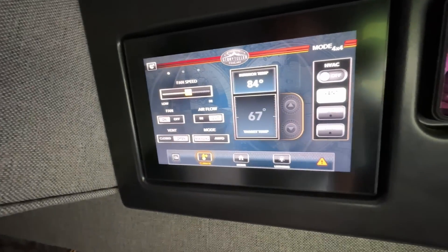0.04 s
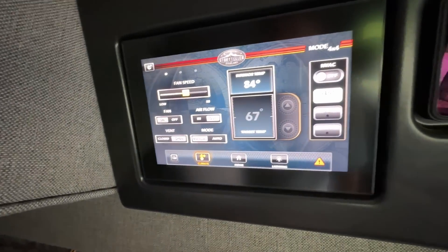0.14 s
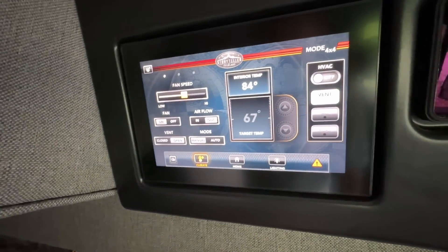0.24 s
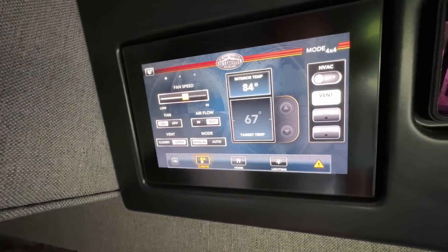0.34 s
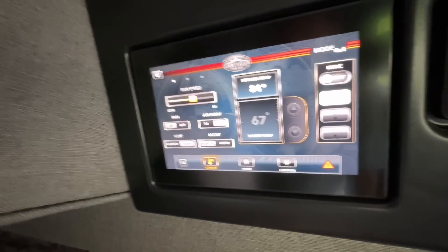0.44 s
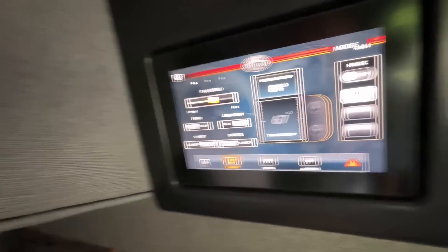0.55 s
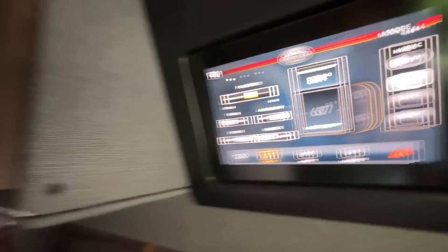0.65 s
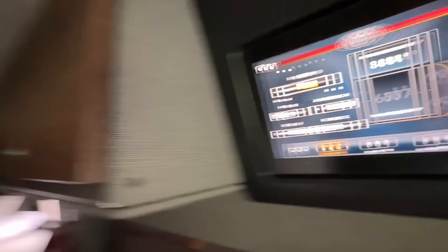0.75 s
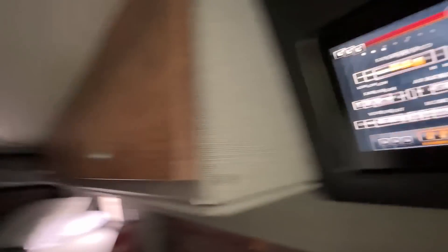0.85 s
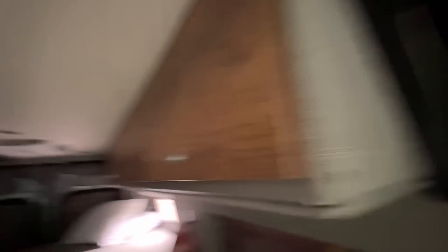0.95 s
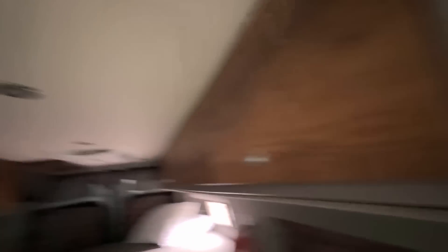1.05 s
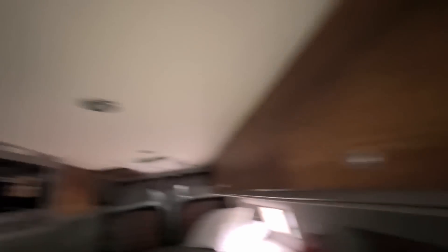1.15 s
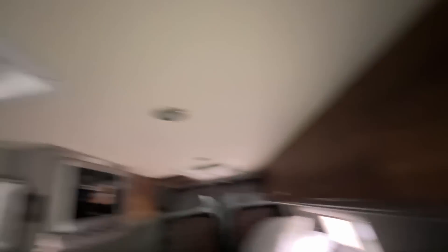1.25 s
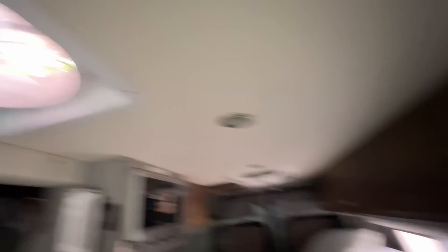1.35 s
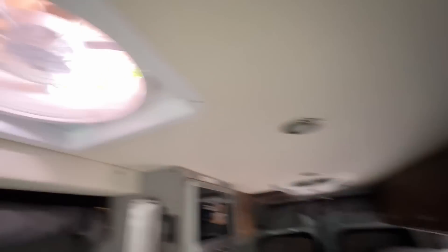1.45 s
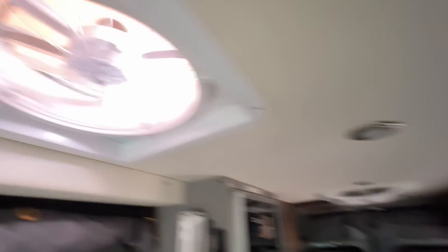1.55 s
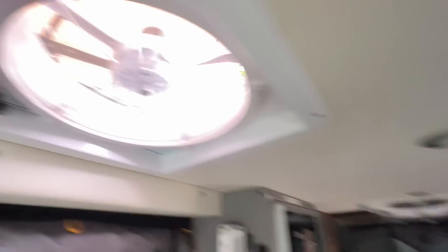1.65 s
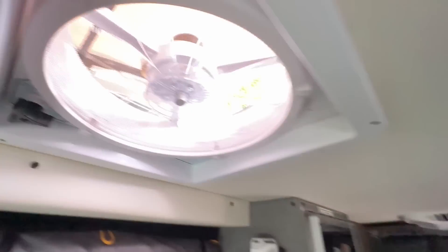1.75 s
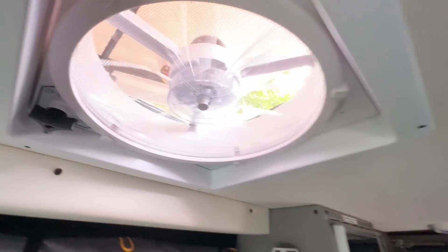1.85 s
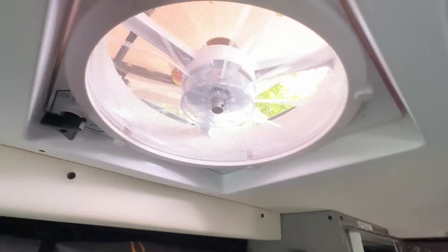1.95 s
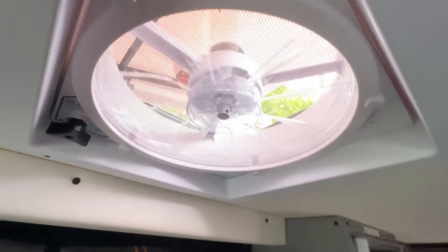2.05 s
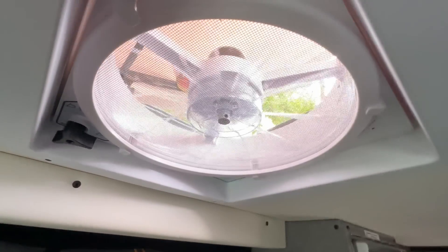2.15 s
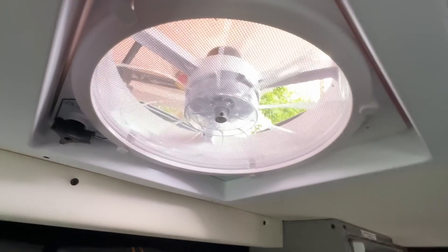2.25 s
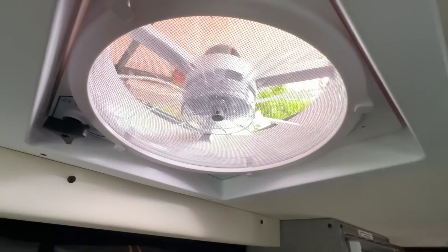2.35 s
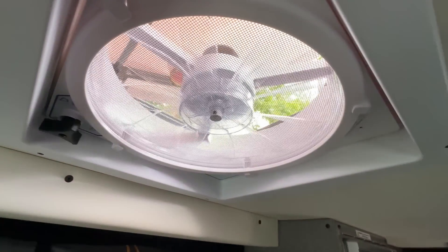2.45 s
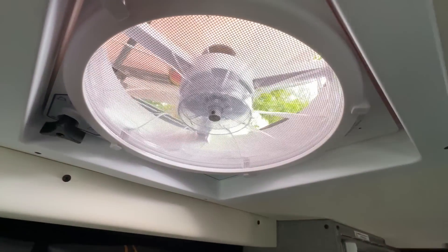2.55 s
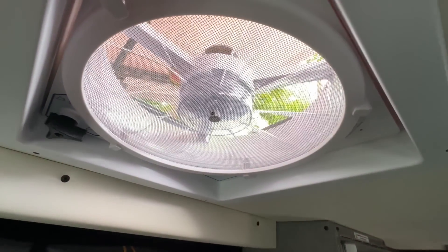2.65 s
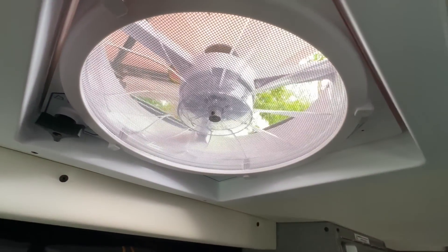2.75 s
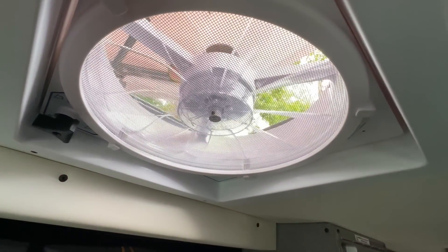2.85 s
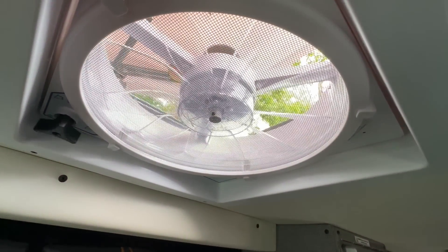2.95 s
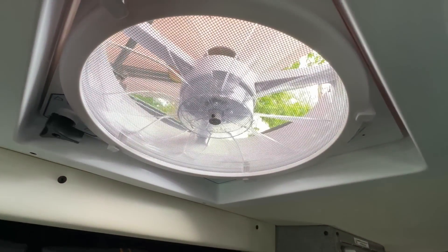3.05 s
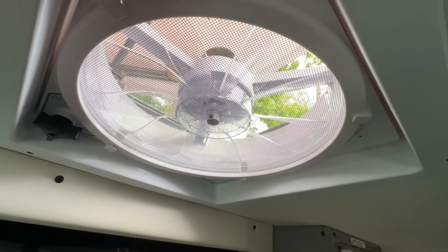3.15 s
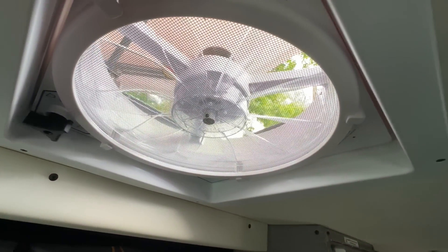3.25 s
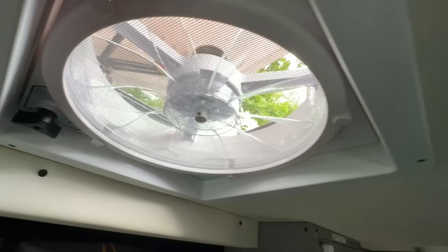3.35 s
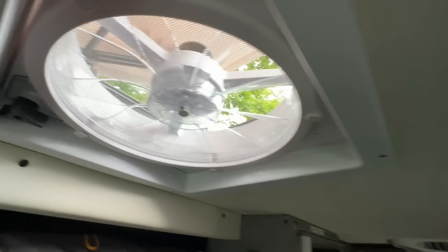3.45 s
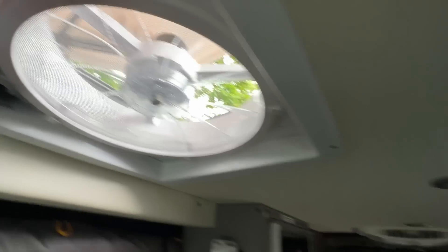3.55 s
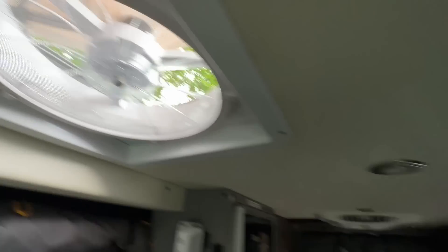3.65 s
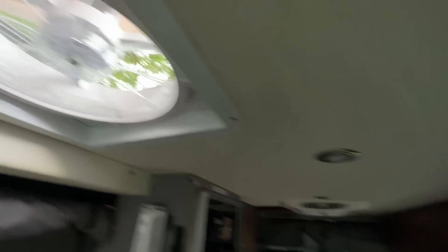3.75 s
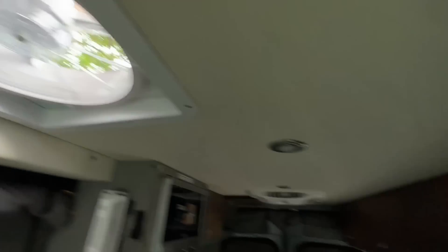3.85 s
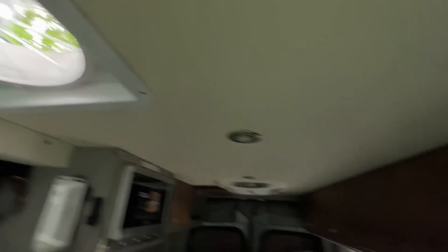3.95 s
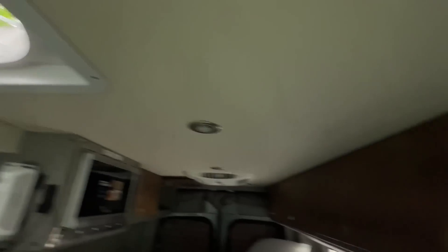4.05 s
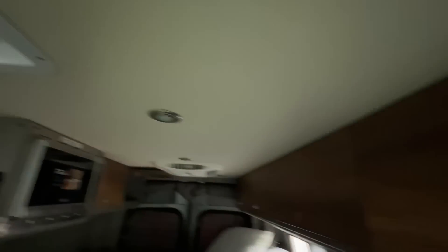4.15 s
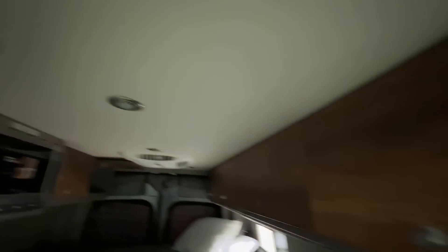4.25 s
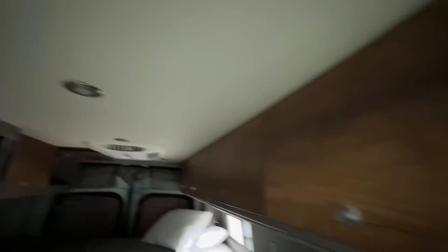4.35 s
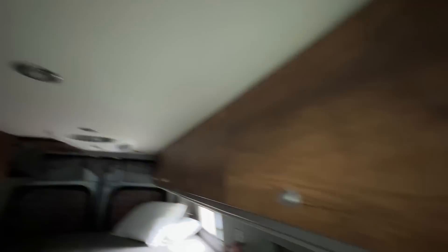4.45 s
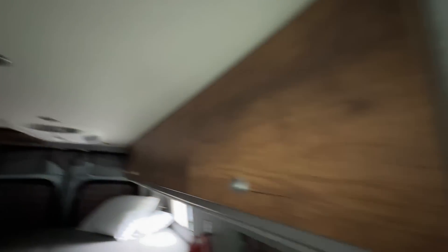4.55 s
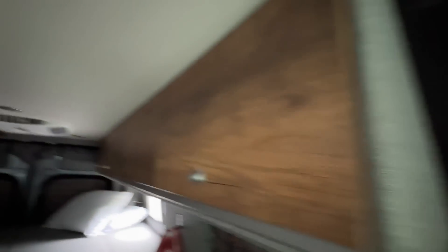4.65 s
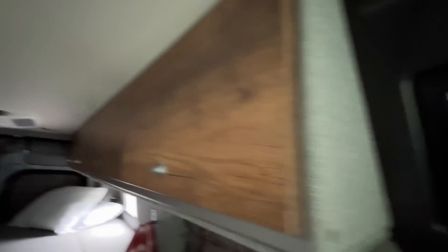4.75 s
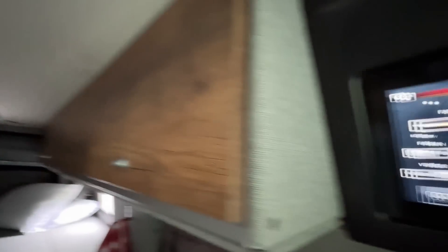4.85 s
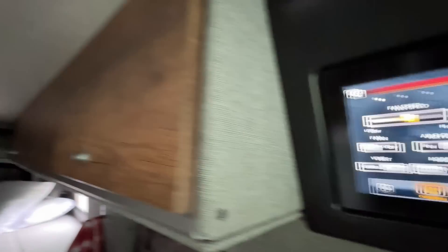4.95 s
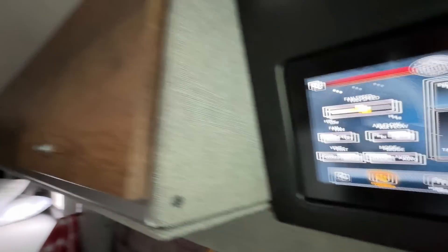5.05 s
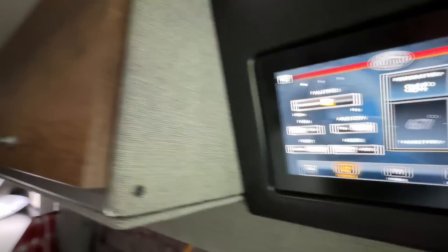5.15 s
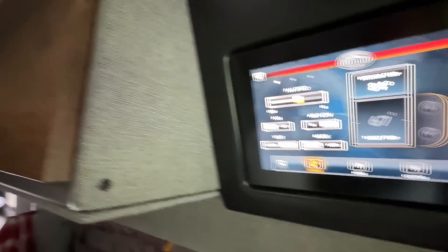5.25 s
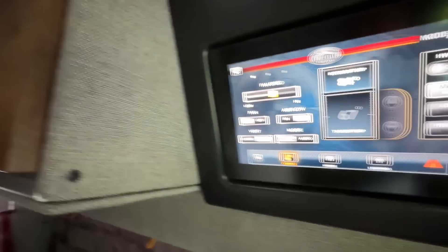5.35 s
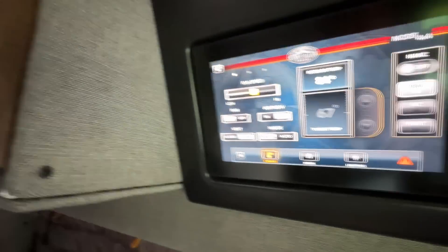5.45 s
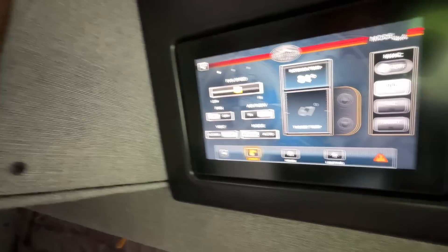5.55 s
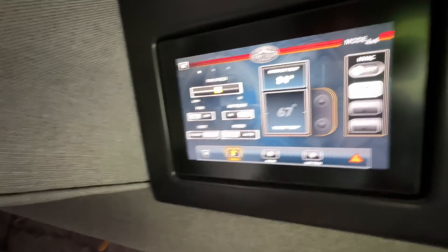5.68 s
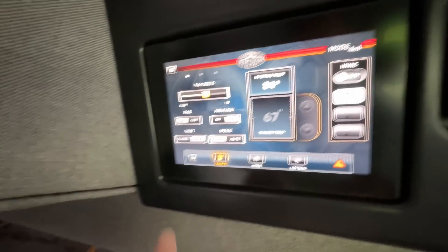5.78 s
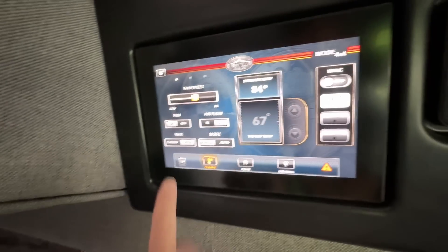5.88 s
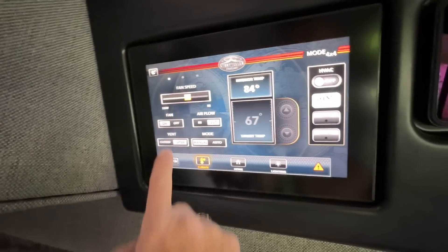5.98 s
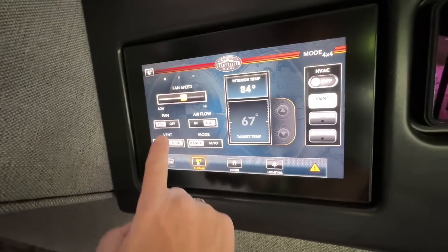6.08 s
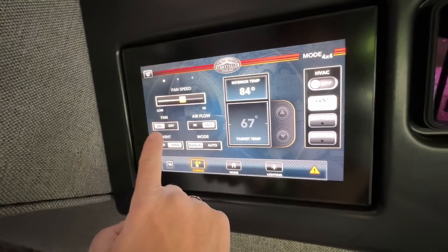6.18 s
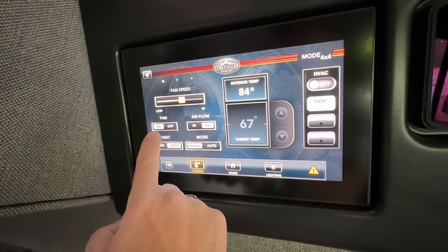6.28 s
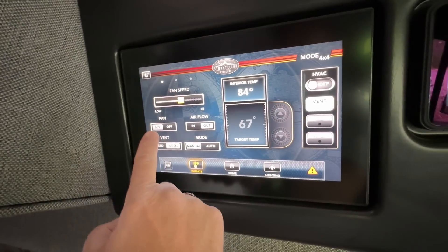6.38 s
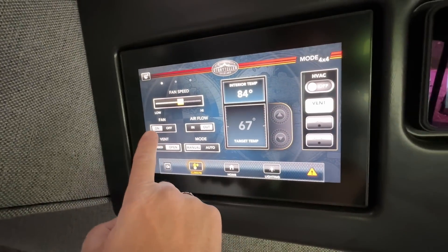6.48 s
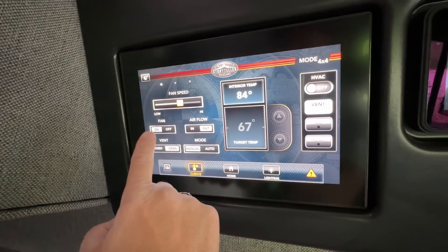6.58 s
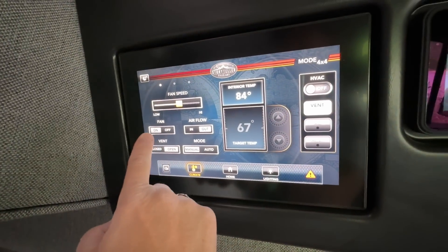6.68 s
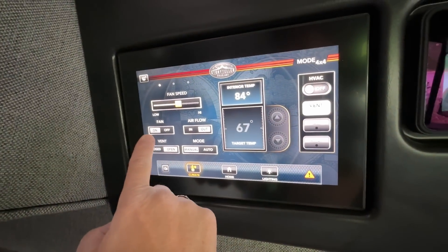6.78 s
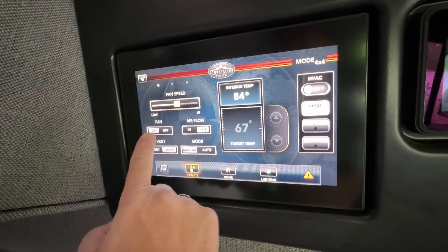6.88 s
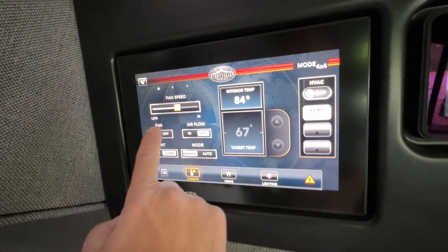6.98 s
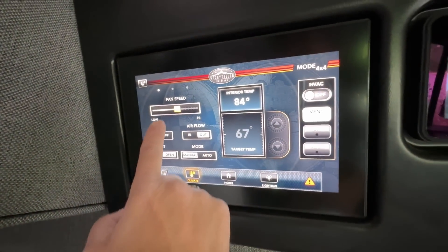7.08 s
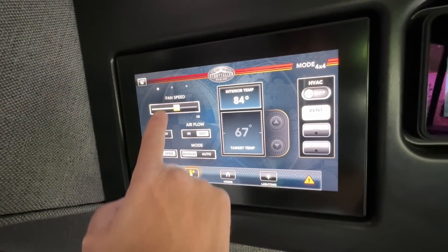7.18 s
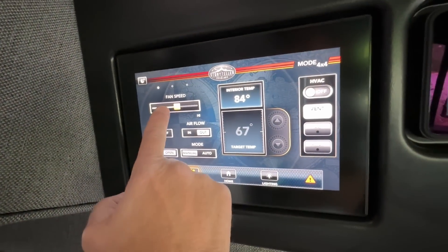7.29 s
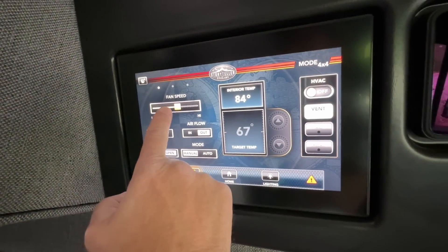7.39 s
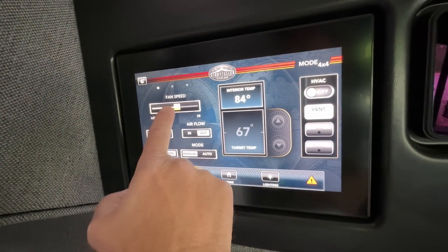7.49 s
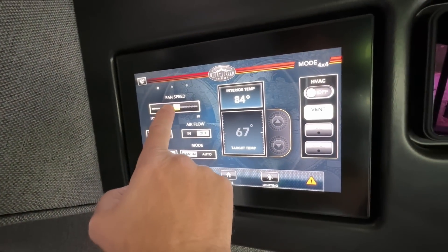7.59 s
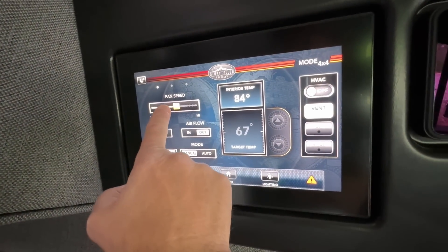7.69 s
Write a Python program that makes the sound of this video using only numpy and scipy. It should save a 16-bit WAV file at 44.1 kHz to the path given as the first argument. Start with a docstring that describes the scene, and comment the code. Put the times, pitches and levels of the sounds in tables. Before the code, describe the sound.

A small geared motor whines steadily with a buzzy, hissing edge inside a van, then loses power, its pitch sliding down into rattle and faint knocks.

```python
"""A small geared motor cranks a roof vent lid open inside a van: its rotor whines twelve times a turn, buzzes
on the multiples of its turn and hisses at the brushes, coloured by the plastic housing. The low end stays
nearly empty until 0.6 s. From 1.4 to 3.9 s the hand-held microphone faces the vent, then swings back, through
the cabin's standing waves. At 6.6 s the power is cut: the tones fall with the rotor, the loose gears rattle,
and a few knocks end it. Rumble and a faint hiss, both filtered noise, remain."""
import sys
import numpy as np
from scipy import signal
from scipy.fft import rfft, irfft
from scipy.io import wavfile
from scipy.ndimage import uniform_filter1d

SR = 44100
rng = np.random.default_rng(int(sys.argv[2]) if len(sys.argv) > 2 else 0)


def store_wav(level_fs):
    """Save 16-bit WAV to argv[1]."""
    pcm = np.round(np.clip(np.atleast_2d(level_fs), -1, 1) * 32767)
    wavfile.write(sys.argv[1], SR, pcm.T.astype(np.int16))


N = 340578
TIME_S = np.arange(N) / SR
FREQ_HZ = np.maximum(np.arange(N // 2 + 1) * SR / N, 1)
SIDES = np.array([[1], [-1]])   # left, right port

# faint hiss, spectrum: f/Hz, relative level/dB
AIR_COLOUR = [(100, -18), (500, 0.5), (1100, 6), (1600, 0), (3000, -7.5), (4500, -13), (7000, -8),
              (9500, -31), (15000, -29)]
AIR_DB = -66.5
# cabin rumble before trim: t/s, deep level/dB, upper level/dB
RUMBLE = [(0, -105, -75), (.54, -99, -75), (.62, -55, -63.5), (1, -58.5, -57), (2.1, -57.5, -52.5),
          (4.5, -56, -55.5), (5.8, -52.5, -57.5), (6.7, -48, -60.5), (7.3, -49, -57), (7.72, -61.5, -59.5)]
# rumble spectrum: f/Hz, relative level/dB
RUMBLE_COLOUR = [(18, -18), (30, -11.5), (42, -2), (52, -8), (72, 5), (105, 0), (180, 3), (250, -3.5),
                 (300, -15.5), (340, -7.5), (450, -38), (1200, -26), (4000, -59.5)]
# low hum before trim: t/s, level/dB
HUM = [(.55, -93), (.9, -48), (1.2, -44), (1.4, -72), (1.8, -47.5), (2.7, -48.5), (3.8, -53), (7.72, -82)]
HUM_HZ = 61.4
# handling sounds: t/s, peak level/dB, rise/s, fall/s, lower edge f/Hz
HANDLING = [(1.059, -47.5, 0.016, 0.023, 6500), (7.097, -49.5, 0.00088, 0.021, 3950)]

# powered rotor, easing once per crank turn: t/s, speed/(turns/s)
RUNNING_SPEED = [(0.0, 104.6), (0.12, 103.9), (0.4, 107.1), (0.68, 107.2), (0.88, 105.0), (1.24, 104.6),
                 (1.44, 105.1), (1.84, 109.2), (1.96, 109.8), (2.08, 108.1), (2.24, 107.7), (2.48, 105.6),
                 (2.64, 106.5), (2.84, 106.9), (3.04, 109.5), (3.16, 109.8), (3.28, 108.9), (3.56, 105.4),
                 (3.64, 103.8), (3.76, 103.5), (3.96, 104.0), (4.08, 103.0), (4.36, 106.9), (4.44, 106.8),
                 (4.6, 108.4), (4.84, 105.5), (5.12, 103.7), (5.44, 104.5), (5.8, 108.5), (5.96, 108.2),
                 (6.12, 105.6), (6.2, 106.0), (6.44, 103.3), (6.56, 103.4)]
# coast under drag and friction: t/s, speed/(turns/s)
COAST_SPEED = [(6.62, 103), (6.66, 99), (6.7, 94.2), (6.81, 79.6), (6.9, 65), (6.98, 57.8), (7.1, 43.9),
               (7.2, 33.8), (7.3, 25), (7.62, 1)]
OFF_S, LOOSEN_S = 6.61, 0.06   # power cut; time the gears take to come loose
# vent as heard: t/s, left port lag/ms, treble left-right level/dB before register share, facing/0-1
BEARING = [(0, -0.308, -1, 0.44), (1.2, -0.27, -3.5, 0.29), (1.4, -0.34, -3, 0.65), (1.65, 0.25, -6, 1),
           (1.9, 0.45, -7, 1), (3.4, 0.48, -7, 1), (3.85, 0.48, -0.5, 0.59), (4.1, -0.55, 0, 0.31),
           (4.7, -0.343, -3.5, 0.35), (5.3, -0.28, -4, 0.22), (5.9, -0.261, -2, 0.45),
           (6.6, -0.292, -3.5, 0.23)]
LOW_LAG_SHARE = 0.7   # reflections shorten the lag of tones below 20 cycles per turn
# wall detours: shortest, longest, sway (1 sigma) as the microphone moves
ECHO_MIN_MS, ECHO_MAX_MS, ECHO_SWAY_MS = 1, 9, 0.22
CABIN_T60_S, CABIN_DB = 0.16, -4   # short ring behind the falling tones

# rough patches where the gears graze: t/s, peak level/dB, half length/s
GRAZES = [(4.17, -46, 0.25), (4.6, -59, 0.21), (6.46, -48.5, 0.16)]
GRAZE_HZ, GRAZE_WIDTH_HZ = 1420, 620
# gearbox resonances: f/Hz, width/Hz, gain/dB
GEARBOX = [(685, 36, 1.5), (1088, 72, 11.5), (1850, 490, 8), (3064, 520, 14.5), (3820, 210, 6.5),
           (4700, 400, -2)]
RATTLE_DB, RATTLE_FALL_DB = -45.5, 25   # at switch-off speed; fall per tenfold drop in speed
# last knocks of the slack gears: t/s, onset level/dB
KNOCKS = [(7.276, -55), (7.325, -62), (7.368, -79), (7.563, -64)]
KNOCK_DECAY_S = 0.01

# strong buzz lines: order/(cycles/turn), level over the rest/dB
BUZZ = [(7, -5.5), (13, -3.5), (15, 2.5), (17, 5), (23, -1), (27, 6.5), (28, -1.5), (32, 10.5), (35, 6.5),
        (37, 10), (42, 4), (44, 1)]
# broad motor spectrum: f/Hz, relative level/dB
COLOUR = [(120, -36.5), (190, -16.5), (330, -11.5), (480, -10), (800, -3), (1400, 11.5), (1950, 2),
          (2400, 2.5), (3400, -2), (5500, -5), (7000, -5.5), (8200, -9), (9500, -31), (11200, -16),
          (13000, -33), (15000, -20.5)]
# housing resonances: f/Hz, width/Hz, gain/dB
HOUSING = [(254, 80, 7), (620, 36, 5), (1100, 88, 4), (1263, 200, 8.5), (1800, 30, 3.5), (2434, 110, 3),
           (2750, 8.8, 2), (2896, 32, 9.5), (3090, 140, 5.5), (3688, 58, 12), (3874, 156, 9.5),
           (4615, 260, 11), (4767, 54, 4), (4930, 520, 5.5), (6460, 60, 9.5), (6124, 650, 8)]
# extra gain of the lowest register: t/s, gain/dB
LOW_MIDS = [(0, -3.5), (.55, -15.5), (.75, -9.5), (1, 0), (1.5, -1.5), (3.3, 3.5), (4.1, -3), (4.85, -5),
            (5.1, -3), (5.8, -6), (6.4, 1), (6.8, -7.5)]
# buzz and brush registers, low to high: level/dB, gain facing the vent/dB,
# loss per tenfold drop in speed/dB, share of the treble left-right dB
REGISTERS = [(-53.5, 2.5, 6, 0.05), (-50.5, 7, 42, -0.12), (-49, 7.5, 26, 0.01), (-49, 8, 34.5, 1.72),
             (-90.5, 31.5, 30, -0.5)]
FADING_HZ = 6   # rate of passing standing waves

# falling tones: order/(cycles/turn), base level/dB, loss per tenfold drop in speed/dB
COAST_TONES = [(12, -50.5, 10), (24, -51, 27), (36, -50, 35), (48, -52.5, 40), (60, -64, 36)]
# peaks and gaps of the path through the cabin: f/Hz, width/Hz, gain/dB
PATH_PEAKS = [(1195, 60, 7), (1450, 160, -7), (2330, 220, -9), (3450, 200, -7), (4200, 380, -12),
              (4720, 350, 6)]
RADIATES_ABOVE_HZ = 660   # the small housing hardly sounds below
BREAK_DB, BREAK_HZ = 3.5, 30   # break-up of falling tones: 1-sigma depth near standstill, rate

# powered tones: order/(cycles/turn), trim on its level curve/dB
HARMONICS = [(12, 0.3), (24, 1.3), (36, 0), (48, 0), (60, 0), (11, -0.5), (10, -1.5), (8, 2), (6, 1)]
# level curves before trim, orders 12, 24, 36, 48, 60 and 11: t/s, left level/dB, right level/dB
WHINE = [(0.0, -44.5, -54.0), (0.26, -44.5, -44.0), (0.42, -33.0, -38.5), (0.62, -36.0, -34.5),
         (0.76, -41.5, -41.5), (0.86, -54.0, -53.5), (0.96, -47.5, -47.0), (1.2, -46.5, -47.5),
         (1.24, -43.5, -44.0), (1.52, -45.5, -42.5), (1.64, -32.0, -27.5), (1.82, -44.5, -40.5),
         (1.92, -41.0, -34.5), (2.14, -32.5, -34.5), (2.28, -35.5, -42.0), (2.42, -33.5, -36.0),
         (2.46, -38.5, -43.0), (2.62, -31.5, -33.5), (2.88, -34.0, -37.0), (2.98, -46.5, -36.0),
         (3.16, -41.5, -34.0), (3.3, -42.5, -38.0), (3.32, -67.5, -38.0), (3.4, -43.5, -46.0),
         (3.46, -38.0, -40.0), (3.56, -42.0, -49.0), (3.58, -49.0, -45.0), (3.72, -38.5, -48.5),
         (3.86, -54.0, -40.0), (4.04, -46.5, -51.0), (4.26, -44.0, -40.5), (4.32, -44.0, -48.0),
         (4.38, -35.0, -38.5), (4.54, -44.0, -40.0), (4.58, -54.0, -49.0), (4.64, -43.5, -43.0),
         (5.06, -53.0, -58.0), (5.34, -44.5, -50.5), (5.4, -48.5, -50.0), (5.5, -40.0, -39.5),
         (5.6, -41.0, -37.5), (5.88, -46.5, -47.5), (6.02, -36.5, -35.5), (6.22, -46.0, -38.0),
         (6.3, -42.0, -41.0), (6.6, -50.0, -50.5)]
WHINE_SECOND = [(0.0, -57.5, -57.0), (0.22, -47.5, -45.0), (0.5, -45.0, -51.0), (0.56, -52.0, -68.0),
                (0.62, -62.0, -48.5), (0.7, -45.0, -45.0), (0.82, -51.0, -58.0), (0.92, -53.5, -48.5),
                (1.12, -48.5, -55.0), (1.38, -49.0, -49.5), (1.58, -38.5, -50.0), (1.78, -45.0, -40.5),
                (1.98, -52.0, -41.0), (2.04, -41.0, -36.5), (2.24, -46.5, -36.0), (2.48, -50.0, -43.5),
                (2.6, -44.0, -38.5), (2.84, -41.0, -42.0), (3.18, -60.0, -45.0), (3.24, -65.0, -39.5),
                (3.32, -51.0, -39.5), (3.46, -45.0, -45.0), (3.88, -56.5, -58.5), (4.32, -52.0, -47.5),
                (4.42, -45.5, -42.5), (4.5, -61.0, -55.5), (4.58, -52.0, -41.0), (4.68, -62.5, -57.5),
                (4.72, -52.0, -45.5), (5.12, -50.5, -51.5), (5.28, -44.5, -46.0), (5.74, -50.5, -51.5),
                (5.78, -66.5, -68.5), (5.96, -51.5, -57.0), (6.0, -42.5, -43.0), (6.6, -57.0, -54.0)]
WHINE_THIRD = [(0.0, -42.5, -42.0), (0.18, -40.5, -41.5), (0.32, -46.0, -35.5), (0.6, -41.5, -36.5),
               (0.68, -52.0, -50.0), (0.76, -45.5, -44.0), (0.98, -47.0, -49.0), (1.1, -45.5, -42.0),
               (1.18, -45.5, -48.5), (1.22, -47.0, -36.0), (1.26, -41.5, -41.0), (1.3, -44.5, -34.5),
               (1.42, -36.5, -35.0), (1.58, -45.0, -33.0), (1.62, -37.0, -38.0), (1.66, -42.5, -41.0),
               (1.94, -46.5, -33.5), (2.12, -45.0, -36.0), (2.14, -47.5, -43.5), (2.2, -43.5, -34.5),
               (2.3, -48.5, -42.5), (2.34, -39.0, -45.5), (2.6, -43.5, -38.0), (2.72, -47.5, -51.0),
               (2.74, -48.0, -45.0), (2.82, -51.5, -56.5), (2.96, -45.5, -38.5), (3.06, -59.5, -39.0),
               (3.18, -50.0, -40.0), (3.24, -52.0, -35.0), (3.52, -39.5, -40.0), (3.54, -42.0, -49.0),
               (3.58, -40.5, -38.5), (3.68, -45.5, -45.0), (3.8, -40.5, -36.5), (3.88, -34.0, -40.5),
               (3.94, -47.0, -33.0), (4.0, -37.0, -46.0), (4.04, -42.0, -36.5), (4.12, -44.5, -44.5),
               (4.18, -44.5, -37.0), (4.28, -41.5, -49.0), (4.44, -42.0, -37.0), (4.52, -46.5, -43.5),
               (4.54, -56.0, -48.5), (4.72, -40.0, -41.0), (4.76, -46.0, -38.0), (5.04, -47.5, -47.0),
               (5.12, -52.0, -48.0), (5.22, -44.5, -46.5), (5.34, -51.0, -49.5), (5.54, -44.5, -43.5),
               (5.6, -41.5, -35.0), (5.76, -49.5, -41.5), (6.0, -42.0, -35.5), (6.2, -48.0, -36.5),
               (6.36, -45.0, -47.0), (6.6, -49.5, -46.5)]
WHINE_FOURTH = [(0, -62, -47), (1.2, -67, -54), (1.65, -58, -47.5), (3.4, -60, -45), (4.1, -53, -48),
                (5.3, -62, -49.5), (6.6, -63, -50.5)]
WHINE_FIFTH = [(0.0, -56, -52.5), (1.14, -65, -63), (1.65, -63, -37), (1.98, -65, -53), (2.04, -51, -38.5),
               (2.76, -71, -51.5), (2.94, -52, -35), (3.0, -64, -53), (3.51, -61, -41), (3.78, -64, -64),
               (3.84, -70.5, -42), (4.17, -58, -51.5), (4.92, -61, -63), (5.4, -67, -67), (5.58, -65, -51),
               (5.94, -79, -52), (6.15, -62, -48), (6.57, -71, -69)]
UNDER_WHINE = [(0.0, -50.0, -57.0), (0.4, -56.0, -50.0), (0.64, -64.0, -52.0), (0.7, -50.0, -48.0),
               (1.12, -48.5, -42.5), (1.16, -58.0, -60.0), (1.3, -43.0, -42.0), (1.36, -55.0, -56.5),
               (1.42, -44.0, -50.5), (1.6, -42.5, -48.0), (1.7, -51.0, -44.0), (1.78, -60.5, -59.5),
               (1.84, -52.5, -51.5), (2.04, -60.0, -53.0), (2.14, -46.5, -53.0), (2.34, -50.5, -52.0),
               (2.94, -50.0, -50.5), (3.38, -53.0, -50.5), (3.78, -44.0, -42.0), (3.92, -53.0, -48.0),
               (3.98, -63.5, -63.0), (4.1, -46.5, -48.0), (4.22, -43.0, -42.0), (4.5, -49.5, -62.0),
               (4.78, -48.0, -41.0), (5.02, -52.0, -51.5), (5.52, -41.0, -43.0), (5.86, -52.5, -52.5),
               (6.1, -50.5, -44.5), (6.6, -58.0, -55.0)]
# level curves before trim, orders 10 and 8: t/s, level/dB
TENTH_ORDER = [(0, -61.5), (5.3, -71.5), (5.6, -52), (5.95, -46), (6.1, -61.5), (6.6, -54)]
EIGHTH_ORDER = [(0, -68), (.6, -78), (1.3, -68), (1.6, -58), (2.3, -57), (2.75, -51), (2.95, -57),
                (3.25, -59), (3.42, -49.5), (3.7, -62), (3.9, -69), (6.6, -66)]
# level curve before trim, order 6: t/s, left level/dB, right level/dB
LOW_OCTAVE = [(0, -68, -69), (.64, -87, -84), (.9, -68, -71), (1.3, -62, -62), (1.62, -56, -61),
              (2.08, -56, -51), (2.52, -57, -60), (2.7, -52, -51), (3.32, -53, -47), (3.8, -56, -62),
              (4.1, -68, -66), (4.6, -63, -60), (4.95, -60, -65), (5.3, -63, -65), (5.75, -75, -74),
              (6.35, -63, -63), (6.6, -65, -66)]
# standing-wave shift between the ports, orders 12 and 36: t/s, left lead/cycles
WHINE_LEAD = [(0.0, -0.32), (0.21, -0.86), (0.75, -0.81), (0.96, -0.55), (1.44, -0.74), (1.47, -0.99),
              (1.77, -1.09), (1.86, -1.35), (2.07, -1.48), (2.3, -1.32), (2.75, -1.33), (2.95, -1.4),
              (3.36, -1.38), (3.6, -1.23), (3.63, -0.96), (3.81, -1.34), (4.26, -1.46), (4.56, -1.37),
              (4.77, -2.16), (5.13, -2.78), (5.43, -2.53), (5.58, -2.87), (6.09, -2.83), (6.3, -2.56),
              (6.57, -2.48)]
THIRD_LEAD = [(0, 1.05), (.3, .8), (.42, 1.05), (.7, 1.1), (1.42, 1.42), (1.53, 1.25), (1.8, 0),
              (2.05, -.43), (2.45, -.25), (2.8, -.48), (3.47, -.12), (3.65, -.5), (3.9, 0), (4.42, -.05),
              (4.65, -.35), (5.05, 0), (6.05, .1), (6.22, -.25), (6.57, .15)]
SLOTS = 12
FLUTTER, WANDER_RAD = 0.2, 0.17   # unsteadiness of powered tones at order 24

CUTOFF_HZ = 15800


def from_db(db):
    """Decibels to gain."""
    return 10 ** (np.asarray(db) / 20)


def rms_one(x):
    """Scale to unit power."""
    return x / np.sqrt(np.mean(x ** 2) + 1e-20)


def in_time(rows):
    """Each column of a curve table at every sample."""
    s, *columns = np.transpose(rows)
    return [np.interp(TIME_S, s, c) for c in columns]


def over_hz(points):
    """A short spectrum on the frequency grid, in dB."""
    hz, db = np.transpose(points)
    return np.interp(np.log(FREQ_HZ), np.log(hz), db)


def shaped(x, gain):
    """Filter by a gain per frequency."""
    return irfft(rfft(x) * gain, N)


def drift(rate_hz):
    """Slow chance with spread 1: low-passed noise made at SR / 32."""
    size = N // 32 + 2
    hz = np.arange(size // 2 + 1) * SR / 32 / size
    slow = irfft(rfft(rng.standard_normal(size)) / (1 + (hz / rate_hz) ** 2), size)
    return np.interp(TIME_S, np.linspace(0, TIME_S[-1], size), rms_one(slow))


def registers(x, edges_hz):
    """Split into adjoining bands, each of unit power."""
    below = [0] + [1 / (1 + (FREQ_HZ / hz) ** 10) for hz in edges_hz] + [1]
    return [rms_one(shaped(x, upper - lower)) for lower, upper in zip(below, below[1:])]


def resonances_db(hz, rows):
    """How much a set of peaks and gaps lifts each frequency."""
    return sum(db / (1 + (2 * (hz - centre) / width) ** 2) for centre, width, db in rows)


def air():
    """A faint, even hiss, different at each port."""
    return from_db(AIR_DB) * rms_one(shaped(rng.standard_normal((2, N)), from_db(over_hz(AIR_COLOUR))))


def rumble(deep_db, upper_db, apart_hz):
    """Low cabin noise; long waves reach both ports nearly alike."""
    mid, side = rng.standard_normal((2, N))
    noise = mid + SIDES * shaped(side, (FREQ_HZ + 80) / (FREQ_HZ + apart_hz))
    deep, upper = registers(shaped(noise, from_db(over_hz(RUMBLE_COLOUR))), edges_hz=[110])
    deep_level_db, upper_level_db = in_time(RUMBLE)
    return deep * from_db(deep_level_db + deep_db) + upper * from_db(upper_level_db + upper_db)


def hum(trim_db):
    """A low sine of wavering phase, alike at both ports."""
    phase = 2 * np.pi * HUM_HZ * TIME_S + 0.5 * drift(3.3)
    return np.sqrt(2) * from_db(in_time(HUM)[0] + trim_db) * np.sin(phase)


def handling():
    """A soft swish and a light tick: bright noise that swells and dies."""
    out = 0
    for s, db, rise_s, fall_s, edge_hz in HANDLING:
        swell = np.exp(-np.maximum((s - TIME_S) / rise_s, (TIME_S - s) / fall_s))
        low_cut = 1 / (1 + (edge_hz / FREQ_HZ) ** 6)
        treble_fall = 1 / (1 + (FREQ_HZ / (0.5 * edge_hz)) ** 3)
        noise = rng.standard_normal((2, N))
        out = out + from_db(db) * swell * rms_one(shaped(noise, low_cut * treble_fall))
    return out


def rotor_speed():
    """Turns per second: the powered run, then the coast almost to rest, with a slight tremble."""
    curve = in_time(list(RUNNING_SPEED) + list(COAST_SPEED))[0]
    return uniform_filter1d(curve, size=SR // 30) * (1 + 0.00108 * drift(31.2))


def gear_load(turns, depth, gear_ratio):
    """The first gear wheel loads the rotor once and twice in each of its own turns, swaying the level."""
    angle = 2 * np.pi * gear_ratio * turns + 0.5 * drift(0.85)
    return 1 + depth * (np.cos(angle) + np.cos(2 * angle))


def wall_echoes(source, count=6):
    """Early reflections whose detours sway with the microphone, so that peaks and gaps wander in the noise."""
    out = 0
    for wall in range(count):
        port_ms = rng.uniform(-0.25, 0.25, (2, 1))
        detour_ms = rng.uniform(ECHO_MIN_MS, ECHO_MAX_MS) + ECHO_SWAY_MS * drift(0.5) + port_ms
        delay = np.round(detour_ms * SR / 1000).astype(int)
        out = out + source[np.maximum(np.arange(N) - delay, 0)]
    return rms_one(out)


def cabin(x):
    """Add a short diffuse ring, different at each port."""
    half = SR // 2
    tail = rng.standard_normal((2, half)) * from_db(-60 * TIME_S[:half] / CABIN_T60_S)
    tail = tail / np.sqrt(np.sum(tail ** 2, axis=1, keepdims=True))
    return x + from_db(CABIN_DB) * signal.fftconvolve(x, tail, axes=1)[:, :N]


def brushes(turns, bite):
    """Sliding noise that swells as commutator gaps pass, once, twice and four times a turn."""
    angle = 2 * np.pi * turns
    contact = np.exp(bite * (0.7 * np.cos(angle) + np.cos(2 * angle) + np.cos(4 * angle)))
    return rms_one(contact * rng.standard_normal(N))


def grazes(turns):
    """Grazing gears: soft, hoarse swells of band noise just above the whine."""
    swell = sum(from_db(db) * np.exp(-((TIME_S - s) / half_s) ** 2) for s, db, half_s in GRAZES)
    scrape = wall_echoes(brushes(turns, bite=0.36))
    band = 1 / (1 + (2 * (FREQ_HZ - GRAZE_HZ) / GRAZE_WIDTH_HZ) ** 4)
    return swell * rms_one(shaped(scrape, band))


def rattle(turns, slowing, loose, bite):
    """Unpowered, the teeth chatter in their backlash and ring the gearbox, ending in separate knocks."""
    chatter = np.array([brushes(turns, bite) for port in range(2)])
    ring = (from_db(resonances_db(FREQ_HZ, GEARBOX)) - 1) / (1 + FREQ_HZ / 1500)
    knocks = 0
    for s, db in KNOCKS:
        knocks = knocks + from_db(db) * (TIME_S > s) * np.exp(-np.abs(TIME_S - s) / KNOCK_DECAY_S)
    level = from_db(RATTLE_DB - RATTLE_FALL_DB * slowing) * loose + knocks
    return level * rms_one(shaped(chatter, ring))


def buzz(turns, fade_hz, corner_order, count=4):
    """No two rotor slots are alike: one uneven ripple a turn, heard over a few paths that come and go."""
    orders = np.arange(72)
    db = np.zeros(len(orders))
    for order, extra_db in BUZZ:
        db[round(order)] = extra_db
    lines = from_db(db) * (orders > 1) / (1 + (orders / corner_order) ** 4)
    out = 0
    for path in range(count):
        one_turn = irfft(lines * np.exp(2j * np.pi * rng.random(len(orders))), 4096)
        ripple = np.interp(turns % 1 * len(one_turn), np.arange(len(one_turn)), one_turn)
        out = out + drift(fade_hz) * ripple
    return rms_one(out)


def rasp(turns, speed, slowing, load, buzz_db, direct_db, diffuse_db, fading_db):
    """Buzz and brush noise ring in the housing; the brushes reach each port directly and by reflections."""
    lag_ms, treble_pan_db, facing = in_time(BEARING)
    source, *reflected = [brushes(turns, bite=0.097) for path in range(3)]
    direct = np.interp(TIME_S - SIDES * lag_ms / 2000, TIME_S, source)   # half the lag at each port
    diffuse = from_db(diffuse_db) * np.array(reflected)
    hiss = rms_one(from_db(direct_db) * direct + wall_echoes(source) + diffuse)
    lines = np.array([buzz(turns, fade_hz=7.1, corner_order=95) for port in range(2)])
    drive = hiss + from_db(buzz_db) * np.sqrt(speed / speed.max()) * lines
    colour_db = over_hz(COLOUR) + resonances_db(FREQ_HZ, HOUSING)
    low, *upper = registers(shaped(load * drive, from_db(colour_db)), edges_hz=[905, 2260, 3700, 7960])
    bands = [low * from_db(in_time(LOW_MIDS)[0])] + upper
    out = 0
    for band, (db, facing_db, fall_db, shadow) in zip(bands, REGISTERS):
        pan_db = SIDES * shadow * treble_pan_db / 2
        level_db = db + facing_db * facing - fall_db * slowing + fading_db * drift(FADING_HZ) + pan_db
        out = out + band * from_db(level_db)
    return out


def radiation_db(hz):
    """Loss of tones too low for the housing to radiate."""
    return -10 * np.log10(1 + (RADIATES_ABOVE_HZ / hz) ** 20)


def tone(order, turns, speed, flutter, wander_rad, lead=None):
    """One unsteady multiple of the turn at both ports, unit power; the left lead follows the bearing unless given."""
    if lead is None:
        share = LOW_LAG_SHARE if order < 20 else 1
        lead = -share * in_time(BEARING)[0] / 1000 * speed * order
    phase = 2 * np.pi * (round(order) * turns + SIDES * lead / 2) + SIDES * wander_rad * drift(17.0)
    wave = (1 + flutter * drift(90)) * np.cos(phase) + flutter * drift(90) * np.sin(phase)
    return wave * np.sqrt(2 / (1 + 2 * flutter ** 2))


def run_down(turns, speed, slowing, gain, flutter, wander_rad):
    """Coasting, the slot harmonics fall through the resonances, flaring at each and breaking up as they slow."""
    slack = np.sqrt(1 - speed / speed.max())
    tones = 0
    for order, db, fall_db in COAST_TONES:
        hz = order * speed
        colour_db = resonances_db(hz, GEARBOX) + resonances_db(hz, PATH_PEAKS) + radiation_db(hz)
        level = from_db(db - fall_db * slowing + colour_db + BREAK_DB * slack * drift(BREAK_HZ))
        tones = tones + level * tone(order, turns, speed, flutter, wander_rad)
    return cabin(gain * tones)


def whine(turns, speed, flutter, wander_rad):
    """Powered slot harmonics and weaker rotor tones fade in the standing waves; higher ones flutter more."""
    curves = (WHINE, WHINE_SECOND, WHINE_THIRD, WHINE_FOURTH, WHINE_FIFTH,
              UNDER_WHINE, TENTH_ORDER, EIGHTH_ORDER, LOW_OCTAVE)   # in the order of HARMONICS
    leads = {SLOTS: in_time(WHINE_LEAD)[0], 3 * SLOTS: in_time(THIRD_LEAD)[0]}
    out = 0
    for (order, db), curve in zip(HARMONICS, curves):
        unsteady = np.sqrt(order / (2 * SLOTS))
        level = from_db(db + np.array(in_time(curve)))
        wave = tone(order, turns, speed, flutter * unsteady, wander_rad * unsteady, leads.get(order))
        out = out + level * wave
    return out


def scene():
    """One rotor drives whine, buzz, brush noise and rattle; rumble, hum and a faint hiss lie below."""
    background = air() + rumble(deep_db=-1.0, upper_db=0.5, apart_hz=600) + hum(trim_db=-3.5) + handling()
    speed = rotor_speed()
    turns = np.cumsum(speed) / SR
    loose = np.clip((TIME_S - OFF_S) / LOOSEN_S, 0, 1)
    slowing = loose * np.log10(np.interp(OFF_S, TIME_S, speed) / speed)   # tenfold drops since switch-off
    slack = np.sqrt(np.clip(1 - speed / 102, 0, 1))   # slower gears play more in their backlash
    load = gear_load(turns, depth=0.065 + 0.081 * slack, gear_ratio=0.265)
    motor = grazes(turns) + load * rattle(turns, slowing, loose, bite=0.11)
    motor = motor + rasp(turns, speed, slowing, load, buzz_db=-9, direct_db=-4, diffuse_db=-4, fading_db=0.61)
    motor = motor + run_down(turns, speed, slowing, load * loose, flutter=0.31, wander_rad=0.94)
    motor = motor + load * (1 - loose) * whine(turns, speed, FLUTTER, WANDER_RAD)
    return background + motor


def record(dry):
    """The top is cut steeply by an elliptic low-pass."""
    return signal.sosfilt(signal.ellip(10, 0.1, 80, CUTOFF_HZ, fs=SR, output="sos"), dry)


dry = scene()
out = record(dry)
store_wav(out)
```